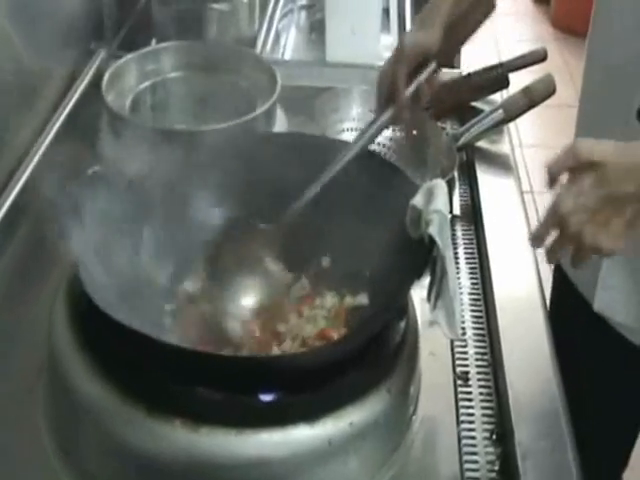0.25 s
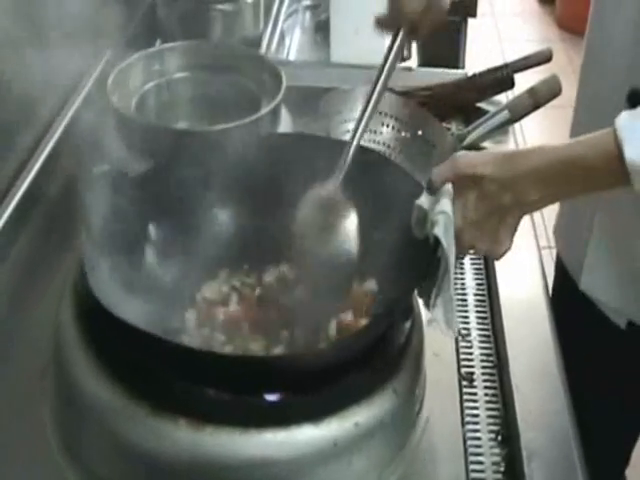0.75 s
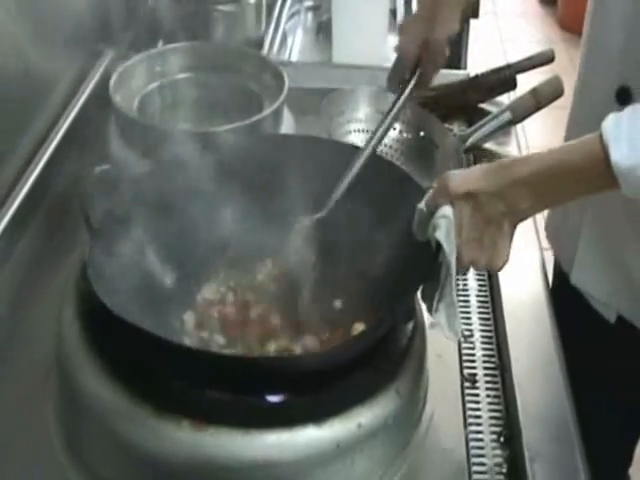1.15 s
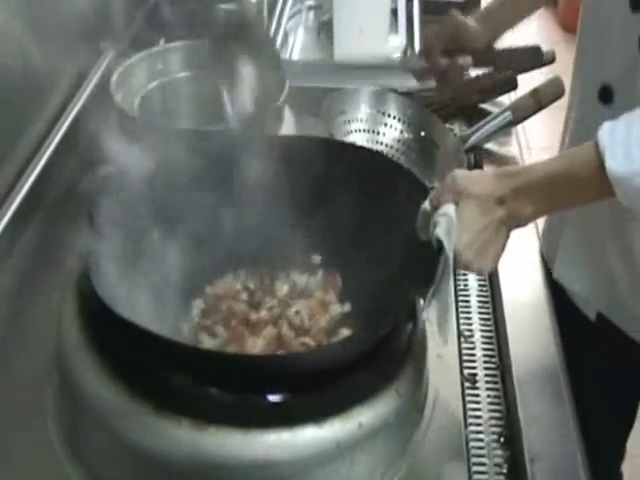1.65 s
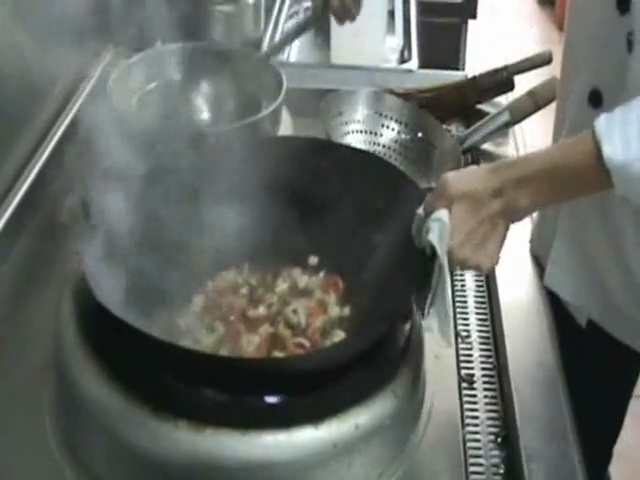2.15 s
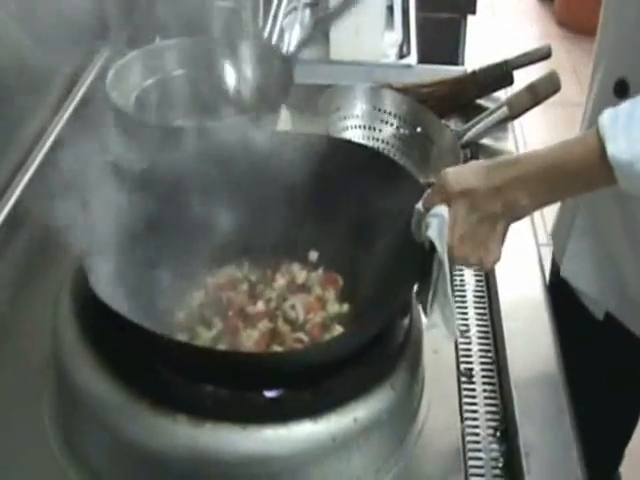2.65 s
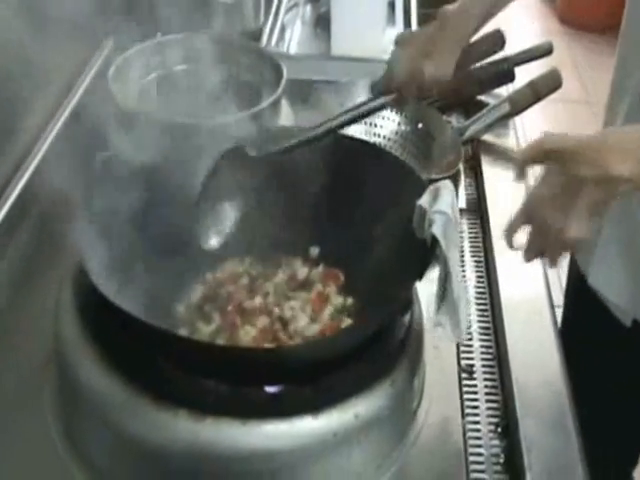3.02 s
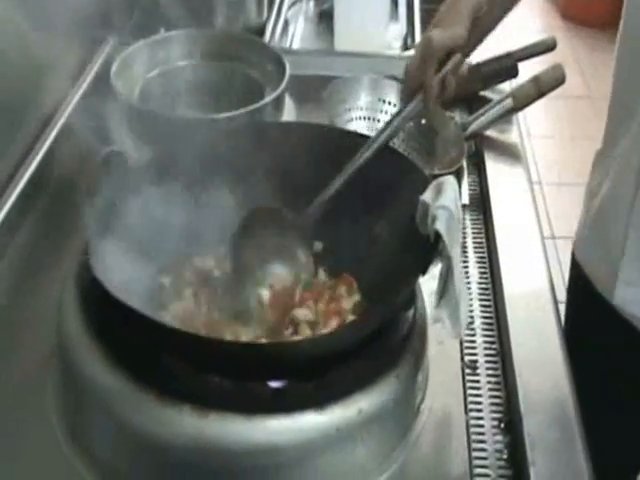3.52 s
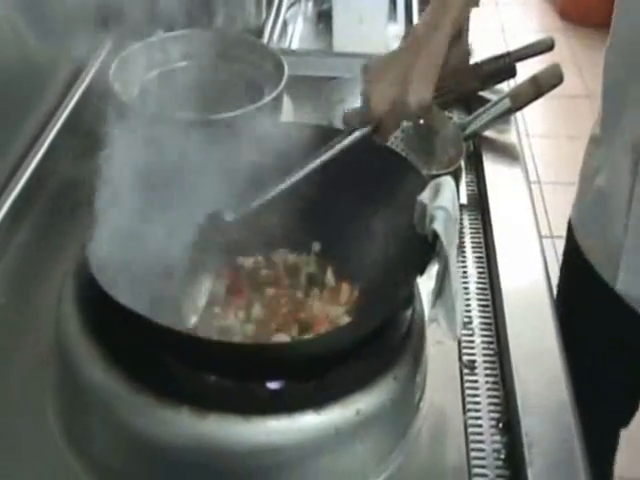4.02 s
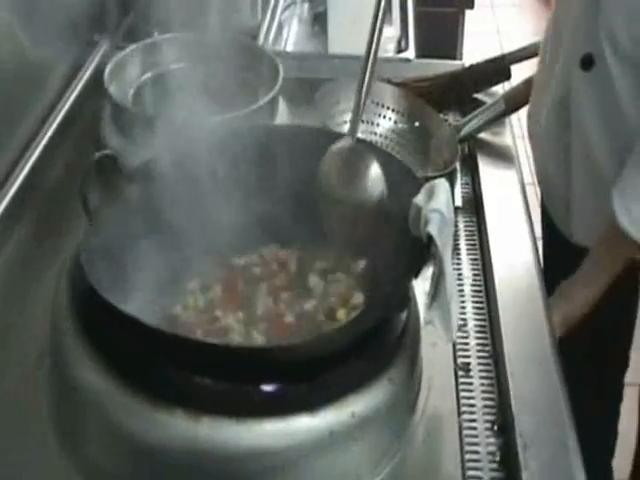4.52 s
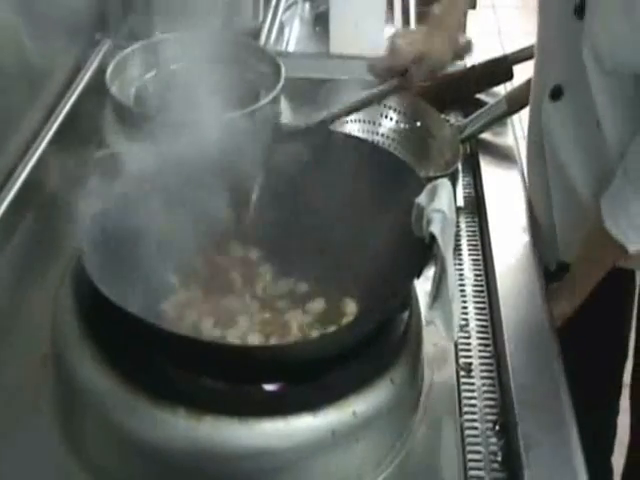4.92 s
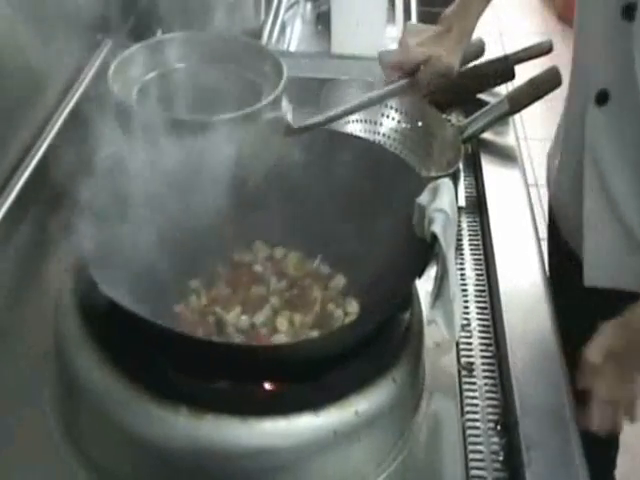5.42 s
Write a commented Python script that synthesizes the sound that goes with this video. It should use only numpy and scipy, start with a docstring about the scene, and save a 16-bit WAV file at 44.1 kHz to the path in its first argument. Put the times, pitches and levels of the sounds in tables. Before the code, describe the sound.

Close wok frying over a fluttering low burner roar, with brief metal ladle knocks, until the gas shuts and only sizzle and dull fan air remain.

```python
"""A tiled kitchen, close to a wok: a forced-air gas burner roars beneath sizzling food before a microphone pair.
The flame is shaped noise with resonances that throb in its chamber; its jets whistle as narrow bands of noise.
Both die when the gas is shut near the end. Frying is flickering hiss with pops, over an extractor's dull air.
A ladle knocks the steel, whose modes ring and echo. The right side hears most pitches late and softer,
and a fast limiter ducks everything under the loudest throbs."""
import sys
import numpy as np
from scipy import signal
from scipy.fft import rfft, irfft, next_fast_len
from scipy.io import wavfile
from scipy.ndimage import uniform_filter1d

SR = 44100
rng = np.random.default_rng(int(sys.argv[2]) if len(sys.argv) > 2 else 0)


def dump(signal):
    """Clip the signal to [-1, 1] and save it as 16-bit WAV at the path in sys.argv[1]."""
    limited = np.clip(np.atleast_2d(signal).T, -1, 1)
    pcm = np.round(limited * 32767).astype(np.int16)
    wavfile.write(sys.argv[1], SR, pcm)


N = 250047  # length in samples

SHUT_S = 5.143  # the gas is shut
ROAR_DB, ROAR_FADE = -23, 89  # base level of the roar in dB, its fade after the shut in dB a second
GUST_DB, GUSTS_PER_S = 0.57, 9.  # random gusting: rms in dB, fastest rate in Hz
# Spectrum of the broad roar. Each row: frequency in Hz, relative density in dB per Hz.
ROAR_SPECTRUM = [(15, -59), (25, -23.5), (102, -11.5), (141, -2.5), (213, -4.5), (253, -5), (305, -8),
                 (437, -17), (743, -22.5), (838, -27.5), (1200, -37.5), (1350, -38), (1500, -32),
                 (1950, -49), (3300, -120)]
# Smaller chamber modes. Each row: frequency in Hz, width in Hz, level against the base level in dB.
CHAMBER_MODES = [(100.75, 29, -5.5), (124.4, 22, -7), (280.4, 14, 0.5), (320, 39, -4), (362.9, 36, -4),
                 (645.3, 41, -11.5), (748, 68, -9)]
# The two strong chamber modes, lower first. Each row: frequency in Hz, width in Hz, steadiness from 0 to 1.
THROB_MODES = [(148.7, 18, 0.33), (253.3, 10.4, 0.5)]
# Ever faster decay of the lower and upper throb after the shut, in dB a second squared.
THROB_FADES = [700., 380.]
# How strongly the flame drives the lower mode. Each row: time in seconds, level in dB.
LOWER_DRIVE = [(0, -20), (.07, -11.5), (.27, -23), (.54, -10), (.67, -18.5), (.84, -15), (1.0, -18),
               (1.5, -20), (1.77, -22), (1.9, -17), (2.76, -16.5), (3.13, -21), (3.27, -16), (3.47, -12),
               (3.6, -17), (4.1, -18.5), (4.6, -16.5), (5.15, -21)]
# How strongly the flame drives the upper mode. Each row: time in seconds, level in dB.
UPPER_DRIVE = [(0.04, -9.5), (.15, -26), (.27, -8.5), (.54, -17), (.63, -11.5), (.68, -20.5), (.9, -9.5),
               (1.2, -16), (1.42, -26), (1.55, -13.5), (2.05, -10.5), (2.65, -11), (2.79, -16.5),
               (2.93, -11.5), (3.15, -9), (3.27, -17), (3.66, -17), (3.9, -10.5), (4.1, -12.5), (4.79, -20),
               (4.88, -8), (4.97, -10), (5.02, -24), (5.09, -10.5), (5.19, -17.5)]


def flame():
    """Combustion noise: turbulent burning is broadband and excites the acoustic modes of its chamber."""
    t = np.arange(N) / SR
    since_shut = np.maximum(t - SHUT_S, 0)
    roar_db = ROAR_DB + GUST_DB * drift(GUSTS_PER_S) - ROAR_FADE * since_shut
    broad = gain_of(4.0) * evened(hiss(ROAR_SPECTRUM, 1.3, 0.099, size=4096))
    small_modes = sum(gain_of(db) * fuzzy_tone(hz, width) for hz, width, db in CHAMBER_MODES)
    burning = gain_of(roar_db) * (broad + small_modes)
    for drive, fade, mode in zip((LOWER_DRIVE, UPPER_DRIVE), THROB_FADES, THROB_MODES):
        throb_db = follow(drive, t)[0] - fade * since_shut ** 2
        burning = burning + gain_of(throb_db) * fuzzy_tone(*mode)
    return burning


JET_LEAD_S, JET_FADE = 0.17, 44  # the whistles fade from this long before the shut, in dB a second
WAVER_DB, WAVERS_PER_S = 1, 12.  # random wavering: rms in dB, fastest rate in Hz
# Resonances of the burner ring. Each row: frequency in Hz, width in Hz, relative level in dB.
WHISTLE_MODES = [(976, 16, -6), (1206, 68, -7), (1516, 70, -5), (1657, 45, -1.5), (1896, 73, -8),
                 (2723, 91, 0), (3840, 115, -5.5), (4043, 87, -7.5)]
# Loudness of the whistles. Each row: time in seconds, level in dB below 2300 Hz, level in dB above it.
WHISTLE_LEVELS = [(0, -29.5, -32), (.5, -31.5, -34.5), (.9, -30.5, -33), (1.2, -29.5, -34.5),
                  (1.6, -31, -33), (2.2, -33, -35), (3.4, -29.5, -32.5), (4.1, -35.5, -33),
                  (4.9, -33, -30.5), (5.2, -26, -35)]


def jets():
    """Jet noise coupled to resonators: gas leaving the nozzles whistles loosely at the modes of the burner ring."""
    t = np.arange(N) / SR
    fade_db = JET_FADE * np.maximum(t - SHUT_S + JET_LEAD_S, 0)
    lower_db, upper_db = (level_db + WAVER_DB * drift(WAVERS_PER_S) - fade_db
                          for level_db in follow(WHISTLE_LEVELS, t))
    return sum(gain_of(db + (upper_db if hz > 2300 else lower_db)) * fuzzy_tone(hz, width, 0.21)
               for hz, width, db in WHISTLE_MODES)


# Tilt of the hiss below about 4600 Hz, with the flame on and off, in dB; time of the change-over in seconds.
TILT_DB, TILT_OFF_DB, TILT_FALL_S = 3.5, 0, 0.12
# Loudness of the frying. Each row: time in seconds, level before the pops in dB.
SIZZLE_LEVELS = [(0, -21.5), (.08, -24.5), (.16, -23), (.4, -21.5), (.6, -25.5), (.68, -23), (.9, -26.5),
                 (1.1, -24.5), (1.44, -23.5), (1.9, -23), (2.05, -24.5), (2.7, -26), (2.79, -24),
                 (2.98, -26.5), (3.7, -20.5), (3.78, -24), (3.98, -20), (4.08, -24), (4.9, -24),
                 (5.27, -21), (5.42, -23.5), (5.67, -23)]
# Spectrum of the frying before the tilt. Each row: frequency in Hz, relative density in dB per Hz.
FIZZ_SPECTRUM = [(100, -43), (300, 0), (500, 3), (1000, -0.5), (2000, -1.5), (3200, -3), (4900, -4),
                 (6200, -2), (8800, -1.5), (10000, -4.5), (11300, -7), (12000, -11.5), (12500, -18),
                 (13500, -19)]


def sizzle():
    """Superposition of random impulses: dense steam bubbles merge into hiss, scattered sharper pops swell it."""
    level_db = follow(SIZZLE_LEVELS, np.arange(N) / SR)[0]
    frame_s = np.arange(4 * N // 512 + 5) * 128 / SR  # frame times of the default hiss
    flame_off = np.clip((frame_s - SHUT_S) / TILT_FALL_S, 0, 1)
    tilt_db = TILT_DB + (TILT_OFF_DB - TILT_DB) * flame_off
    bed = evened(hiss(FIZZ_SPECTRUM, 0.86, 0.37, tilt_db))
    pop_happens = rng.random(N) < 300 / SR  # about 300 a second
    pops = gain_of(3.2 * np.minimum(rng.exponential(1, N), 5)) * pop_happens
    glow = signal.lfilter([1.], [1, -np.exp(-1 / (0.0038 * SR))], pops)  # each decays over 3.8 ms
    return gain_of(level_db) * bed * (1 + 0.09 * glow / glow.mean())


# Ladle contacts. Each row: start in seconds, strike level in dB, drive of the low modes against the high in dB,
# best-driven low frequency in Hz, best-driven high frequency in Hz, scrape decay in seconds, ring time as a factor.
KNOCKS = [(1.148, -19.5, 5, 960, 3000, .0015, .75), (1.176, -25, -6, 1100, 2850, .004, 1),
          (1.215, -28, -2, 1220, 2950, .005, 1), (1.529, -16.5, -4, 1800, 2400, .007, .35),
          (1.568, -21, -5, 1700, 2500, .006, .3), (1.686, -44, 22, 740, 2700, .001, .5),
          (1.985, -18, 0, 1200, 2750, .013, .28)]
# Modes of the steel. Each row: frequency in Hz, relative level in dB, 60 dB decay in seconds before the ring factor.
STEEL_MODES = [(760, 3, .09), (950, 3, .08), (1040, 1, .12), (1222, 0, .3), (1500, -1, .08), (1950, 0, .08),
               (2270, -1, .09), (2400, -2, .09), (2580, 0, .12), (2770, -1, .1), (2885, 1, .17),
               (2955, -3, .17), (3050, 2, .08), (3200, 1, .12), (3300, 1, .08), (3440, 1, .1),
               (3620, 1, .07), (4250, 6, .07)]


def ladle():
    """Modal excitation: a blow and a gritty scrape drive the steel near favoured pitches; the walls smear an echo."""
    out = np.zeros(N + SR)
    t = np.arange(SR // 4)[:, None] / SR
    hz, mode_db, t60 = np.transpose(STEEL_MODES)
    turns = .5 * rng.random(len(STEEL_MODES))  # starting phases in cycles
    grits = rng.standard_normal((len(KNOCKS), len(t)))
    for (s, strike_db, low_db, low_hz, high_hz, scrape, ring), grit in zip(KNOCKS, grits):
        low_drive_db = low_db - 70. * np.log2(hz / low_hz) ** 2
        high_drive_db = -35. * np.log2(hz / high_hz) ** 2
        drive_db = np.maximum(low_drive_db, high_drive_db)
        decay_db = 60 * t / (ring * t60)
        modes = (gain_of(mode_db + drive_db - decay_db) * np.sin(2 * np.pi * (hz * t + turns))).sum(1)
        modes = modes * np.minimum(t[:, 0] / 0.0012, 1)  # contact time
        contact = grit * np.exp(-t[:, 0] / max(scrape, .001))
        contact = contact / np.linalg.norm(contact)
        contact[0] += 0.003 / max(scrape, .001)  # the blow itself: the shorter the scrape, the cleaner
        out[round(s * SR):][:2 * len(t) - 1] += gain_of(strike_db) * signal.fftconvolve(modes, contact)
    walls = rng.standard_normal(len(t)) * gain_of(-60 * t[:, 0] / 0.35)  # falls 60 dB in 0.35 s
    echo = signal.fftconvolve(out, walls / np.linalg.norm(walls))[:N]
    return np.array([out[:N] + gain_of(-11.) * echo, gain_of(-5.0) * echo])  # direct, diffuse


RUMBLE_DB = -32  # level of the extractor's air
# Spectrum of the moving air. Each row: frequency in Hz, relative density in dB per Hz.
AIR_SPECTRUM = [(15, -35), (25, -21), (75, 1), (150, -5), (400, -5.5), (550, -20.5), (800, -20),
                (1500, -10.5), (2500, -36), (4000, -35)]
# The blade tone, one row: frequency in Hz, width in Hz, level in dB.
BLADE_TONE = (1187, 19, -38.5)


def extractor():
    """Fan noise: turbulence gives the hood a dull rush of air, the passing blades a thin tone."""
    hz, width, db = BLADE_TONE
    air = gain_of(RUMBLE_DB) * evened(hiss(AIR_SPECTRUM, 0.73, 0.13, size=4096))
    return air + gain_of(db) * fuzzy_tone(hz, width, 0.2)


def fuzzy_tone(hz, width, steadiness=0.):
    """Narrowband noise: a resonance fed at random, direct and diffuse; a self-driven mode evens out its swing."""
    r = np.exp(-np.pi * width / SR)
    noise = rng.standard_normal((2, N)) + 1j * rng.standard_normal((2, N))
    swing = signal.lfilter([1 - r], [1, -r], noise)
    swing = signal.lfilter([1 - r * r], [1, -r * r], swing)
    swing = swing / (abs(swing) + 1e-9) ** np.clip(steadiness, 0, 1)
    carrier = np.exp(2j * np.pi * hz * np.arange(N) / SR)
    return evened((swing * carrier).real)


def hiss(points, patchy_db, flicker_db, tilt_db=0., size=512):
    """Random short-time spectra, direct and diffuse, with drifting patches and a flicker shared by all bins."""
    frames, hz = 4 * N // size + 5, np.fft.rfftfreq(size, 1 / SR)
    a, b, c, d, patches = rng.standard_normal((frames, len(hz), 5)).T
    patches = uniform_filter1d(patches, size=7, axis=0)  # across frequency
    patches = evened(uniform_filter1d(patches, size=20, axis=1))  # across time
    flicker = evened(uniform_filter1d(rng.standard_normal(frames), size=5))
    lows = 1 / (1 + (hz[:, None] / 4600.0) ** 4)
    spectrum_db = read(points, hz)
    field_db = spectrum_db[:, None] + patchy_db * patches + flicker_db * flicker + tilt_db * lows
    z = np.array([a + 1j * b, c + 1j * d]) * gain_of(field_db)
    level = np.sqrt(np.mean(gain_of(spectrum_db) ** 2) * 8 / 3 * size)
    return signal.istft(z, nperseg=size, noverlap=size * 3 // 4)[1][:, :N] / level


def drift(per_s):
    """Slow random modulation of rms 1: superposed sines of random phase, from 0.5 Hz up to a rate."""
    t = np.arange(0, N + 64, 64) / SR
    rates = np.geomspace(.5, per_s, num=30)[:, None]
    sines = np.sin(2 * np.pi * (rates * t + rng.random(rates.shape)))
    wave = (sines / rates ** 0.083).sum(0)
    return np.interp(np.arange(N) / SR, t, evened(wave))


def gain_of(db):
    """Logarithmic level: decibels to amplitude."""
    return 10 ** (np.asarray(db) / 20)


def evened(x):
    """Power normalisation: scales to rms 1."""
    return x / np.sqrt(np.mean(x ** 2) + 1e-20)


def read(points, hz):
    """Logarithmic pitch: a spectrum table read on a log-frequency axis."""
    f, value = np.transpose(points)
    return np.interp(np.log(hz + 1), np.log(f + 1), value)


def follow(rows, t):
    """Linear interpolation: the columns of a curve table at times t."""
    s, *columns = np.transpose(rows)
    return [np.interp(t, s, c) for c in columns]


# Coherence of the pair. Each row: frequency in Hz, left-right likeness from 0 to 1.
LIKENESS = [(25, .3), (45, .6), (80, .94), (150, .985), (300, .98), (600, .88), (1200, .85), (2500, .7),
            (5000, .68), (7000, .84), (9000, .94), (10500, .995), (12000, .9995)]
# Phase difference of the pair. Each row: frequency in Hz, lead of the left in radians.
LEFT_LEAD = [(25, 1.3), (70, 0.2), (150, 0.95), (280, 1.2), (600, 1.71), (1300, 1.37), (2800, 1.01),
             (4400, 0.19), (7000, 0.45), (10500, 0.12)]
# Level difference of the pair. Each row: frequency in Hz, left minus right in dB.
LEFT_LOUDER = [(25, -16), (60, 0.5), (300, 0.3), (680, 1.5), (1240, 3), (2280, 4.5), (4180, 6.5), (6000, 2),
               (8000, 1), (10500, 0)]


def microphones(direct, diffuse):
    """Interaural-style phase, level and coherence: the right port lags and blends in unrelated diffuse sound."""
    size = next_fast_len(N)
    hz = np.fft.rfftfreq(size, 1 / SR)
    same = np.clip(read(LIKENESS, hz), 0, 1)
    half_gain = gain_of(read(LEFT_LOUDER, hz) / 2)  # each side takes half of the difference
    half_turn = np.exp(.5j * read(LEFT_LEAD, hz))
    left = rfft(direct, size)
    right = same * left + np.sqrt(1 - same ** 2) * rfft(diffuse, size)
    pair = np.array([left * half_turn * half_gain, right / half_turn / half_gain])
    return irfft(pair, size)[:, :N]


def scene():
    """Linear superposition: all sources add up and reach the microphone pair."""
    direct, diffuse = flame() + jets() + sizzle() + ladle() + extractor()
    return microphones(direct, diffuse)


EDGE_HZ = 13000  # upper band limit


def record(dry):
    """Dynamic compression: a linked limiter ducks fast on peaks and recovers steadily; clipping; band limit."""
    loud = dry * gain_of(2.0)
    peak_db = 20 * np.log10(abs(loud).max(0) + 1e-6)
    fall = np.arange(N) * 260.0 / SR  # recovery at 260 dB a second
    held_db = np.maximum.accumulate(peak_db + fall) - fall
    over_db = np.maximum(held_db + 3.0, 0)  # threshold -3 dB
    r = np.exp(-1 / (0.0015 * SR))  # lag of 1.5 ms
    duck_db = 0.63 * signal.lfilter([1 - r], [1, -r], over_db)
    clipped = np.clip(loud / gain_of(duck_db), -.97, .97)
    low_pass = signal.firwin(511, EDGE_HZ, window=("kaiser", 9), fs=SR)
    return signal.oaconvolve(clipped, low_pass[None], "same")


dry = scene()
out = record(dry)
dump(out)
```